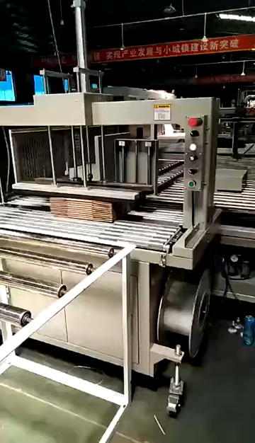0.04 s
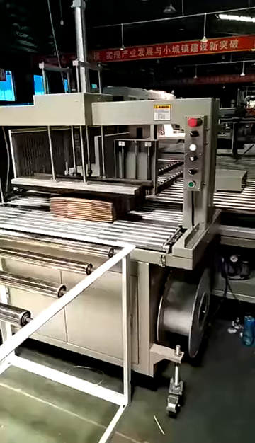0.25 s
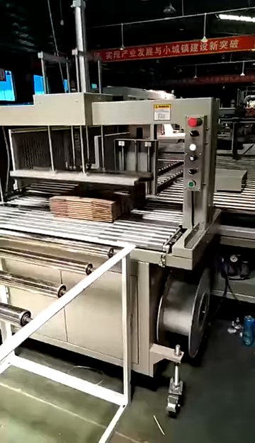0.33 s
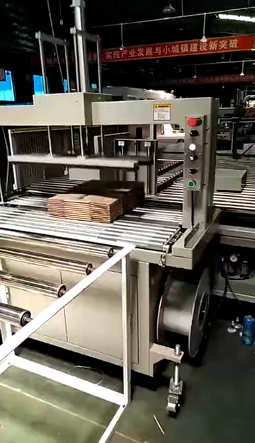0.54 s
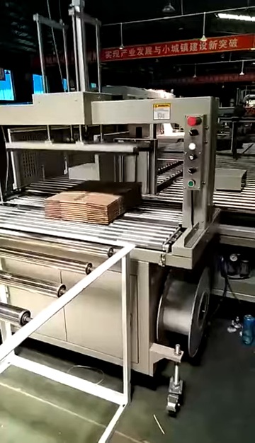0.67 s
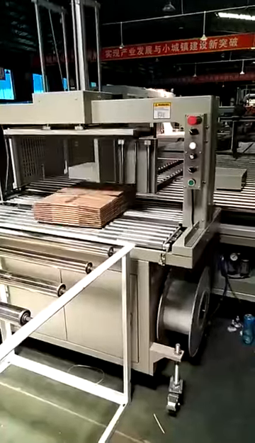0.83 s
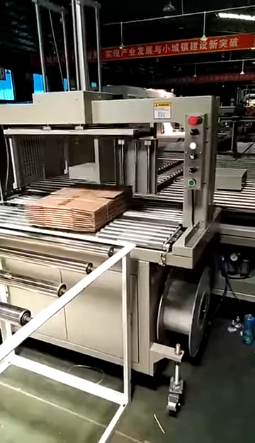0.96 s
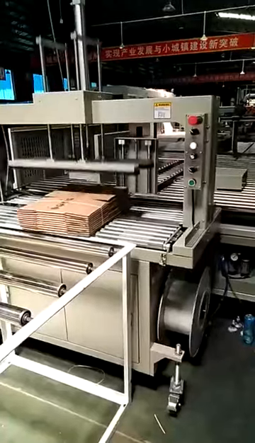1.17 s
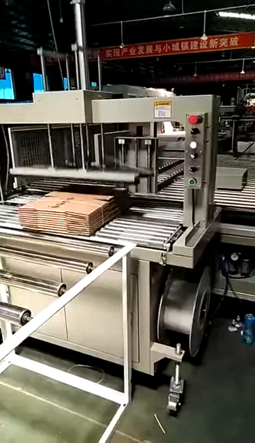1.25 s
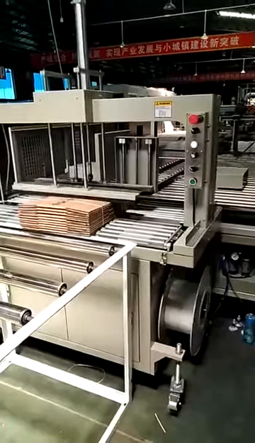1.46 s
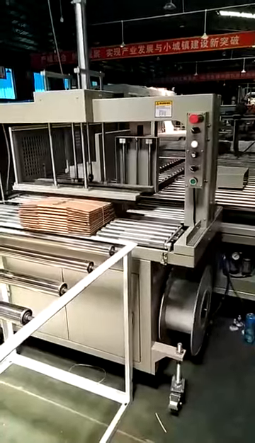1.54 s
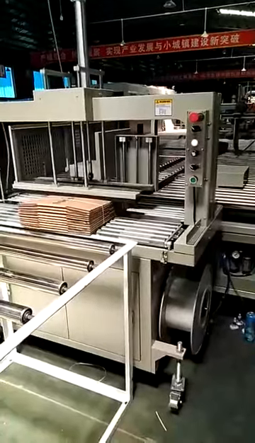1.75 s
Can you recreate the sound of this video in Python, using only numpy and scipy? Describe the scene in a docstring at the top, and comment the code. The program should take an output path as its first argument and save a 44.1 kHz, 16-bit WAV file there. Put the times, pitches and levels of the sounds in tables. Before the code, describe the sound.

Air hisses as a packing machine's press bar rises, clanks, and cardboard scuffs over rollers.

```python
"""A strapping machine on a factory floor, heard from close by on a single microphone.
Compressed air hisses while the press bar rumbles up its guides and clanks twice at the top. The valve
spits, a cardboard bundle scuffs and squeaks over the rollers, and the bar comes down on it with a soft
thud. Behind it the conveyor and the hall drone, and the room gives back a short echo."""
import sys
import numpy as np
from scipy import signal
from scipy.fft import rfft, irfft
from scipy.io import wavfile
from scipy.ndimage import uniform_filter1d

SR = 44100
rng = np.random.default_rng(int(sys.argv[2]) if len(sys.argv) > 2 else 0)


def store_wav(level_fs):
    """Save 16-bit WAV to argv[1]."""
    pcm = np.round(np.clip(np.atleast_2d(level_fs), -1, 1) * 32767)
    wavfile.write(sys.argv[1], SR, pcm.T.astype(np.int16))


N = 79380

# murmur of machines farther off in the hall (frequency [Hz], level [dB])
MURMUR_SPECTRUM = [(40, -14.5), (70, -21.5), (115, 2.5), (190, -2.5), (260, 1.5), (400, -0.5), (580, -7.5),
                   (730, -3), (900, -7), (1140, -9.5), (1450, -11), (2000, -13), (2900, -16.5), (3750, -21),
                   (4500, -13.5), (6000, -20.5), (7600, -19.5)]
# swell of that murmur (time [s], level [dB])
MURMUR_LEVEL = [(.08, -39), (.9, -42), (1.17, -41.5), (1.28, -43.5), (1.39, -43), (1.45, -39.5),
                (1.58, -40), (1.71, -42.5), (1.8, -41)]
# hum of the conveyor motor (frequency [Hz], level [dB])
MOTOR_TONES = [(226, -67.5), (592, -61.5), (910, -64.5)]
# rumble of the conveyor rollers (time [s], level [dB])
ROLLER_LEVEL = [(.08, -57.5), (.85, -64.5), (.95, -46.5), (1.05, -56), (1.1, -44.5), (1.21, -45.5),
                (1.27, -51.5), (1.5, -54.5), (1.71, -54), (1.79, -42), (1.8, -35)]
# resonances of the steel guards and rollers (frequency [Hz], width [Hz], level [dB])
STEEL_MODES = [(232.6, 22, -8), (348.6, 9.1, -11.5), (443, 10, -8), (591.2, 16, -7), (1115, 70, -9.5),
               (1283, 33, -3.5), (1426, 8.3, -1), (1804, 11, -10), (2002, 30, -10.5), (3180, 55, -11),
               (4760, 29, -9), (5700, 63, -10), (6280, 19, -10), (7410, 57, -11.5)]
# taps of rollers and guides (time [s], level [dB], frequency [Hz])
ROLLER_KNOCKS = [(.2, -28.5, 2880), (.201, -25.5, 2205), (0.896, -31, 1090), (.971, -34, 1562),
                 (1.177, -37, 1383), (1.332, -38, 1910), (1.467, -35, 1520), (1.481, -30.5, 1410),
                 (1.49, -40.5, 1660), (1.518, -36, 1305), (1.544, -35, 1028)]
# cardboard scuffing over the rollers (time [s], length [s], level [dB], centre [Hz], width [Hz])
BUNDLE_SCUFFS = [(0.153, 0.018, -34, 1720, 1300), (0.828, 0.11, -41, 1570, 1200),
                 (0.939, 0.27, -48, 1370, 1000), (1.154, 0.02, -42, 1110, 1300),
                 (1.219, 0.12, -49.5, 1930, 800), (1.453, 0.051, -39.5, 1390, 1000),
                 (1.501, 0.036, -39, 1204, 900), (1.659, 0.028, -45, 1200, 1200)]
# cardboard squeaking (time [s], length [s], level [dB], from [Hz], to [Hz], width [Hz])
BUNDLE_SQUEAKS = [(.94, 0.12, -47, 1122, 1094, 110), (.99, 0.068, -46, 1290, 1255, 114.5),
                  (1.0, .1, -50.5, 3090, 3040, 150)]
# bumps of the bar in its guides and on the bundle (time [s], level [dB], frequency [Hz])
BAR_THUDS = [(.414, -30, 252), (0.447, -21, 270), (.699, -22, 290), (1.158, -38, 412), (1.312, -27.5, 201),
             (1.433, -34.5, 324), (1.53, -34.5, 200), (1.612, -36, 566)]
# rumble of the bar along its guides (time [s], level [dB])
TRAVEL_LEVEL = [(.085, -52), (.17, -38), (.26, -33.5), (.32, -24), (.41, -25.5), (.48, -26.5), (.57, -26.5),
                (.705, -26), (.775, -37.5), (.8, -42), (.88, -41)]
# colour of the shaken frame (frequency [Hz], level [dB])
FRAME_SPECTRUM = [(18, -28), (30, -13.5), (86, 1.5), (119, -4.5), (140, 0), (242, -2.5), (371, -4.5),
                  (408, -2.5), (523, -7.5), (608, -15), (800, -26.5), (1040, -42.5), (1760, -120)]
# blows of the bar at its top stop, in two clusters (time [s], level [dB])
BAR_BLOWS = [(.728, -21), (.738, -31), (.764, -15.5), (.771, -21), (.779, -28)]
# ringing of the bar (frequency [Hz], level [dB], T60 [s])
BAR_RING = [(59, -9, 0.15), (131, -5.5, 0.051), (491, -8, 0.059), (873, -12.5, 0.059), (1113, -3.5, 0.071),
            (1448, -13.5, .1), (2047, -6, 0.054), (2385, -18.5, 0.067)]
# puffs from the valves (time [s], length [s], level [dB], centre [Hz], width [Hz])
VALVE_PUFFS = [(.82, 0.052, -34.5, 6200, 2200), (0.888, .008, -34, 6300, 2000),
               (1.005, 0.0079, -37, 6900, 1500), (1.04, 0.061, -39.5, 6760, 2190),
               (1.136, .03, -45, 5800, 3020), (1.235, 0.031, -39.5, 4800, 4500),
               (1.31, 0.026, -45, 6830, 2200), (1.452, 0.1, -60, 5500, 3940),
               (1.645, 0.039, -48, 5340, 4040)]
# whistling spits of air (time [s], length [s], level [dB], from [Hz], to [Hz], width [Hz])
VALVE_SPITS = [(.27, 0.01, -31, 5170, 5060, 500), (.405, 0.017, -29, 4350, 4680, 900),
               (.419, 0.021, -28.5, 4900, 5760, 692), (.785, 0.017, -24.5, 7230, 7170, 1410),
               (.795, 0.014, -19.5, 6175, 5860, 1200), (1.042, 0.017, -37, 5060, 5270, 500),
               (1.066, 0.011, -42.5, 5600, 5480, 605), (1.252, .027, -48, 5470, 5230, 600),
               (1.253, 0.032, -45.5, 3100, 2990, 710)]
# air rushing through the cylinder and hoses (time [s], level [dB])
CYLINDER_LEVEL = [(.09, -50), (.15, -40), (.205, -31), (.29, -30), (.36, -27.5), (.44, -31), (.52, -31),
                  (.67, -29.5), (.735, -27), (.78, -30), (.81, -32), (.835, -37), (.9, -43)]
# colour of that rush (frequency [Hz], level [dB])
CYLINDER_SPECTRUM = [(350, -28.5), (600, -1.5), (796, -14.5), (907, -0.5), (983, -4), (1130, -2),
                     (1310, -5.5), (1420, -1.5), (1760, -4), (1920, -2), (3400, -14), (4420, -65.5),
                     (7480, -120)]
# hiss at the exhaust port as the bar rises (time [s], level [dB])
JET_LEVEL = [(.09, -43.5), (.17, -44), (.21, -30), (.35, -28), (.55, -27.5), (.68, -27.5), (.725, -24),
             (.775, -26.5), (.815, -31), (.835, -48)]
# air bleeding off as the bar comes down (time [s], level [dB])
BLEED_LEVEL = [(.82, -49.5), (1.0, -56), (1.15, -49.5), (1.32, -48.5), (1.37, -57)]
# colour of the exhaust port (frequency [Hz], level [dB])
PORT_SPECTRUM = [(2600, -7), (3400, -2), (3900, 0.5), (4300, 4.5), (4700, 3), (5300, 1), (5650, 5),
                 (5950, 2), (6150, 2), (6750, 5.5), (7100, 4), (7450, 7), (7650, -17.5)]


def undb(db):
    """Decibels to gain."""
    return 10 ** (np.asarray(db) / 20)


def unit(x):
    """Scale to rms 1."""
    return x / np.sqrt(np.mean(x ** 2) + 1e-18)


def clock():
    """Time of every sample in seconds."""
    return np.arange(N) / SR


def curve(rows):
    """Gain from (time [s], level [dB]) points, silent outside them."""
    times, db = np.array(rows).T
    return undb(np.interp(clock(), times, db, left=-120, right=-120))


def wander(per_s):
    """Smooth random drift with rms 1."""
    hold = max(int(SR / per_s), 2)
    steps = np.repeat(rng.standard_normal(N // hold + 1), hold)
    return unit(uniform_filter1d(steps, hold)[:N])


def colour(x, points):
    """Shape x by (frequency [Hz], level [dB]) points, falling 20 dB an octave beyond them."""
    hz, db = np.array(points).T
    octave = np.log2(np.maximum(np.fft.rfftfreq(N, 1 / SR), 1))
    outside = np.maximum(np.log2(hz[0]) - octave, 0) + np.maximum(octave - np.log2(hz[-1]), 0)
    gain = undb(np.interp(octave, np.log2(hz), db) - 20 * outside)
    return unit(irfft(rfft(x) * gain, N))


def band(x, hz, width_hz):
    """Pass x through the same resonance twice."""
    f = np.maximum(np.fft.rfftfreq(N, 1 / SR), 1)
    resonance = 1 / (1 + 1j * (f * f - hz * hz) / (f * width_hz * np.sqrt(2)))
    return unit(irfft(rfft(x) * resonance ** 2, N))


def turbulence(flicker_db):
    """White noise whose octave bands flicker on their own."""
    spectrum = rfft(rng.standard_normal(N))
    octave = np.log2(np.maximum(np.fft.rfftfreq(N, 1 / SR), 20) / 20)
    bands = (irfft(spectrum * np.maximum(1 - abs(octave - k), 0), N) for k in range(11))
    return unit(sum(noise * undb(flicker_db * wander(per_s=22)) for noise in bands))


def grains(per_s, share):
    """Tiny random impacts carry this share of the power, smooth noise the rest."""
    clicks = (rng.random(N) < per_s / SR) * rng.standard_normal(N)
    return np.sqrt(share) * unit(clicks) + np.sqrt(1 - share) * rng.standard_normal(N)


def burst(start, length, attack_s, release_s):
    """Linear attack, hold and exponential release."""
    age = clock() - start
    return np.clip(age / attack_s, 0, 1) * np.exp(-np.maximum(age - length, 0) / release_s)


def glides(rows, attack_s, release_s):
    """Rough tones: narrow bands of noise that slide in pitch."""
    out = np.zeros(N)
    for start, length, db, from_hz, to_hz, width_hz in rows:
        hz = np.interp(clock(), [start, start + length], [from_hz, to_hz])
        phase = 2 * np.pi * np.cumsum(hz) / SR
        lowpass = signal.butter(2, width_hz / 2, fs=SR, output="sos")
        a, b = signal.sosfilt(lowpass, rng.standard_normal((2, N)))
        tone = unit(a * np.cos(phase) + b * np.sin(phase))
        out += undb(db) * tone * burst(start, length, attack_s, release_s)
    return out


def hall_drone():
    """Farther off, machines murmur and clatter behind the conveyor's wavering hum and rumble."""
    waver_db, drift = 4, 0.008
    hum = np.zeros(N)
    for hz, db in MOTOR_TONES:
        gain = np.sqrt(2) * undb(db + waver_db * wander(per_s=5))
        pitch = hz * (1 + drift * wander(per_s=15))
        hum += gain * np.sin(2 * np.pi * np.cumsum(pitch) / SR)
    machines = turbulence(flicker_db=0.5) + grains(per_s=120, share=0.19)
    murmur = colour(machines, MURMUR_SPECTRUM) * curve(MURMUR_LEVEL)
    rollers = band(rng.standard_normal(N), hz=70, width_hz=32) * curve(ROLLER_LEVEL)
    return hum + murmur + rollers


def hall_echo(x):
    """The hall returns a diffuse tail whose treble lingers slightly longer."""
    low_t60_s, treble_t60_s, build_s = 0.62, 0.75, 0.035
    t, noise = clock(), rng.standard_normal(N)
    low = signal.sosfiltfilt(signal.butter(2, 2500, fs=SR, output="sos"), noise)
    tail = low * undb(-60 * t / low_t60_s) + (noise - low) * undb(-60 * t / treble_t60_s)
    tail *= np.clip(t / build_s, 0, 1)
    return signal.fftconvolve(x, unit(tail) / np.sqrt(N))[:N]


def steel_guards(x):
    """Guards and rollers ring along with everything, lifting it at their own pitches."""
    f = np.maximum(np.fft.rfftfreq(2 * N, 1 / SR), 1)
    ringing = sum(undb(db) / (1 + 1j * (f * f - hz * hz) / (f * width)) for hz, width, db in STEEL_MODES)
    return irfft(rfft(x, 2 * N) * (1 + ringing))[:N]


def roller_knocks():
    """Light taps on rollers and guides ring a short mode and a faint lower one."""
    decay_s = 0.0076
    out = np.zeros(N)
    for start, db, hz in ROLLER_KNOCKS:
        age = np.maximum(clock() - start, 0)
        phase = 2 * np.pi * hz * age
        ring = np.sin(phase) + undb(-17.5) * np.sin(0.65 * phase)
        out += undb(db) * ring * np.exp(-age / decay_s)
    return out


def cardboard_bundle():
    """Cardboard catches and slips on the rollers in dense little ticks, and squeaks as it slides."""
    scuffs = np.zeros(N)
    for start, length, db, hz, width_hz in BUNDLE_SCUFFS:
        fibres = band(grains(per_s=2100, share=0.62), hz, width_hz)
        scuffs += undb(db) * fibres * burst(start, length, attack_s=0.02, release_s=0.02)
    return scuffs + glides(BUNDLE_SQUEAKS, attack_s=0.01, release_s=0.011)


def bar_thuds():
    """Soft contacts with the guides and the bundle ring two well-damped modes."""
    out = np.zeros(N)
    for start, db, hz in BAR_THUDS:
        phase = 2 * np.pi * hz * (clock() - start)
        ring = np.sin(phase) + undb(-7.5) * np.sin(0.58 * phase)
        out += undb(db) * ring * burst(start, length=0.0064, attack_s=0.0032, release_s=0.006)
    return out


def bar_rumble():
    """The rising bar judders in its guides and shakes the frame."""
    judder = grains(per_s=700, share=0.33)
    return undb(-0.5) * colour(judder, FRAME_SPECTRUM) * curve(TRAVEL_LEVEL)


def bar_clanks():
    """Each blow on the top stop rings the bar with a crunch of contact; a buffer softens the attack."""
    contact_s, buffer_s = 0.0037, 0.00098
    out = np.zeros(N)
    for start, db in BAR_BLOWS:
        age = np.maximum(clock() - start, 0)
        detunes = 1 + 0.008 * rng.standard_normal(len(BAR_RING))
        ring = sum(undb(mode_db - 60 * age / t60) * np.sin(2 * np.pi * hz * detune * age)
                   for (hz, mode_db, t60), detune in zip(BAR_RING, detunes))
        crunch = band(rng.standard_normal(N), hz=1500, width_hz=1300) * np.exp(-age / contact_s)
        out += undb(db) * (ring + undb(-8) * crunch) * np.minimum(age / buffer_s, 1)
    return out


def valves():
    """The valves let out broad puffs of air and narrow, whistling jets."""
    puffs = np.zeros(N)
    for start, length, db, hz, width_hz in VALVE_PUFFS:
        hiss = band(rng.standard_normal(N), hz, width_hz)
        puffs += undb(db) * hiss * burst(start, length, attack_s=0.015, release_s=0.012)
    return puffs + glides(VALVE_SPITS, attack_s=0.008, release_s=0.007)


def compressed_air():
    """Air roars in the cylinder and hisses at the port on the way up, then bleeds off on the way down."""
    flutter = undb(wander(per_s=90.35))
    roar = undb(-1) * colour(turbulence(flicker_db=1.3), CYLINDER_SPECTRUM) * curve(CYLINDER_LEVEL)
    # the broad hiss thins briefly while the jet whistles
    choke = undb(-7 * burst(start=0.399, length=0.054, attack_s=0.0089, release_s=0.0089))
    outflow = undb(-3.5) * curve(JET_LEVEL) * choke + curve(BLEED_LEVEL)
    hiss = colour(turbulence(flicker_db=1.3), PORT_SPECTRUM) * outflow
    return flutter * (roar + hiss)


def scene():
    """The machine up front, its echo and the drone behind, alike in both channels."""
    air = compressed_air() + valves()
    bundle = cardboard_bundle() + roller_knocks()
    bar = bar_rumble() + bar_clanks() + bar_thuds()
    machine = air + bundle + bar
    room = undb(-14.5) * hall_echo(machine) + hall_drone()
    return np.tile(undb(-0.5) * steel_guards(machine + room), (2, 1))


def record(dry):
    """The microphone channel opens with a quick fade and loses the deepest bass and the top."""
    open_s, fade_s, fade_from_db = 0.084, 0.073, -10
    low_cut_hz, top_hz = 38, 7660
    age = clock() - open_s
    fade = (age > 0) * undb(fade_from_db * np.clip(1 - age / fade_s, 0, 1))
    thinned = signal.sosfilt(signal.butter(3, low_cut_hz, "high", fs=SR, output="sos"), dry)
    lowpass = signal.firwin(601, top_hz, window=("kaiser", 8), fs=SR)
    return signal.fftconvolve(thinned * fade, lowpass[None], mode="same", axes=1)


dry = scene()
out = record(dry)
store_wav(out)
```